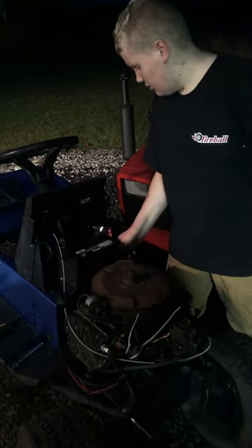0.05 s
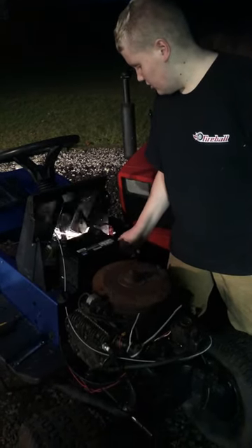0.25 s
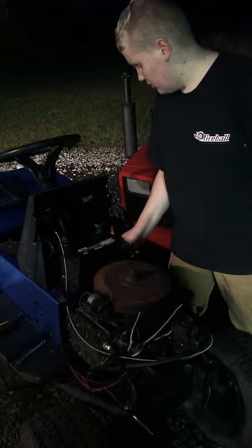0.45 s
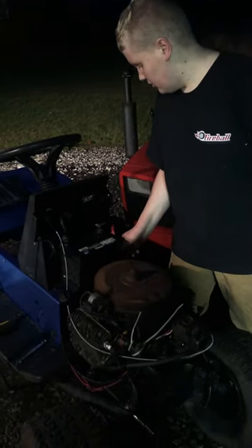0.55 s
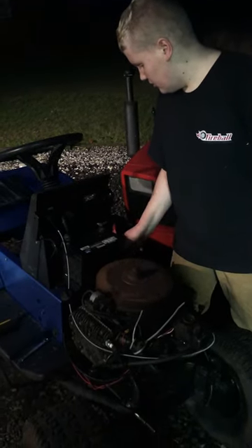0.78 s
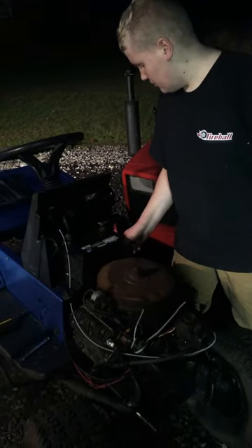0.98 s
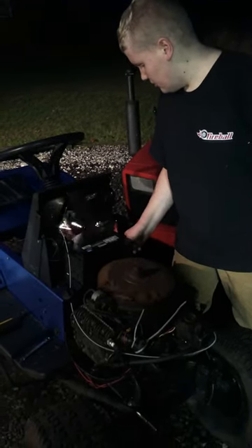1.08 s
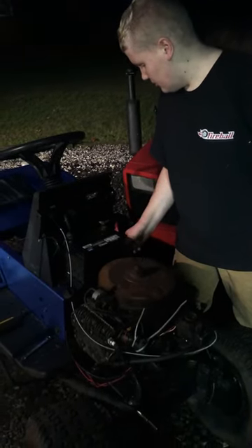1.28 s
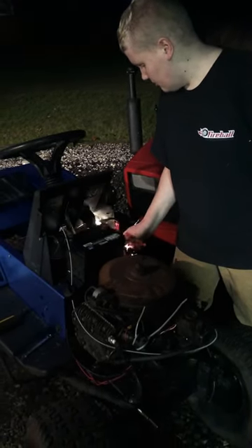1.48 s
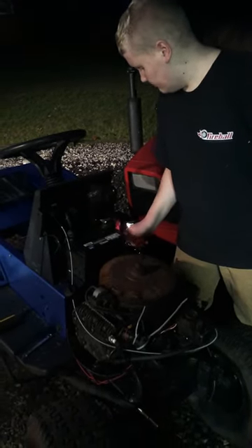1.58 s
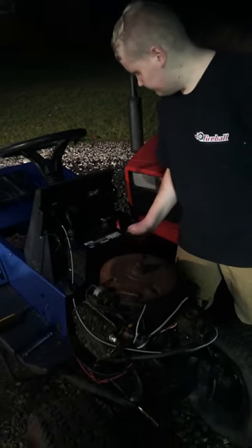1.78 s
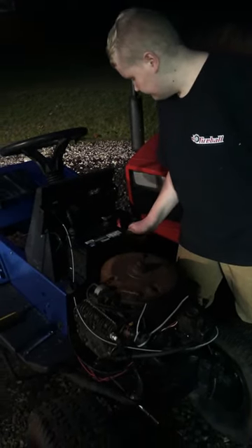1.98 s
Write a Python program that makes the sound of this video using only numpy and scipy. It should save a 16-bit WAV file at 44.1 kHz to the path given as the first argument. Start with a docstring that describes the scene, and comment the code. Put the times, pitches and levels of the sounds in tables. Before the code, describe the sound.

Electrical sparks snap among metallic starter clacks, outdoors over a faint low drone. A first spark at 0.1 seconds leads into scraping, sizzling and a loud clack and crack around 0.3. Uneven clacks, solenoid knocks and sparks continue from 0.45 to 1.2, the flywheel softly ringing. After a lull, another flurry starts at 1.5, ending with a sharp snap at 1.7 and a fading ring. The engine never fires.

```python
"""Outdoors at night, under a low, distant drone, a live cable is touched to the starter terminal of a
small tractor engine. A faint, dark rustle dies away, then the first spark snaps and echoes in the
engine bay. The starter gear clacks and drags on the flywheel, which rings, while the contact fries.
The solenoid plunger slams home and a loose part pings. Sparks, clacks and scrapes return in uneven
flurries, ending on a sharp snap and a last ring of the flywheel; the engine never fires."""
import sys
import numpy as np
from scipy import signal
from scipy.fft import irfft
from scipy.io import wavfile
from scipy.ndimage import uniform_filter1d

SR = 44100
rng = np.random.default_rng(int(sys.argv[2]) if len(sys.argv) > 2 else 0)


def digitize_waveform(pressure):
    """Quantize a signal to 16-bit integers and store it at the path in sys.argv[1].

    Rows of a 2-D input are taken as channels; values are limited to [-1, 1].
    """
    field = np.atleast_2d(pressure).T
    bounded = np.clip(field, -1, 1)
    quanta = np.round(bounded * 32767).astype(np.int16)
    wavfile.write(sys.argv[1], SR, quanta)


N = 90404
T = np.arange(SR * 3 // 5) / SR  # time axis of a single hit [s]


def amp(db):
    """Decibels to gain."""
    return 10 ** (np.asarray(db) / 20)


def unit(x):
    """Scales to rms 1."""
    return x / np.sqrt(np.mean(x ** 2) + 1e-20)


def read(points, hz):
    """Reads a curve on a log-frequency axis."""
    f, value = np.transpose(points)
    return np.interp(np.log(hz + 1), np.log(f), value)


def add(mix, s, sound):
    """Mixes a sound in at s seconds."""
    part = mix[max(round(s * SR), 0):][:len(sound)]
    part += sound[:len(part)]


def colour(x, eq, size=2048):
    """Minimum-phase EQ with unit power gain: only the curve's shape counts."""
    log_gain = np.log(unit(amp(read(eq, abs(np.fft.fftfreq(size, 1 / SR))))))
    taps = np.fft.ifft(np.exp(np.conj(signal.hilbert(log_gain)))).real
    return signal.fftconvolve(x, taps)[:len(x)]


def tilted(eq, db_per_octave):
    """A brighter or duller version of an EQ curve."""
    return [(hz, db + db_per_octave * np.log2(hz)) for hz, db in eq]


def hiss(n):
    """Noise with a flat spectrum and random phases."""
    return unit(irfft(np.exp(2j * np.pi * rng.random(n // 2 + 1)), n))


def fizz(n, grain_db=4):
    """Hiss with a fast, grainy flicker in level."""
    flicker = unit(uniform_filter1d(rng.standard_normal(n), size=40))
    return hiss(n) * unit(amp(grain_db * np.clip(flicker, -2, 2)))


def wander(shape, width_hz):
    """Random phase drift that widens a pure tone."""
    return np.cumsum(rng.standard_normal(shape), -1) * np.sqrt(2 * np.pi * width_hz / SR)


def ring(modes, detune=0., attack_s=1 / SR, width_hz=0.):
    """Modes that build up and decay, slightly different at every blow."""
    hz, db, t60 = np.transpose(modes)[:, :, None]
    hz = hz * (1 + detune * rng.standard_normal(hz.shape))
    t = T[:int(SR * t60.max())]
    envelope = np.minimum(t / attack_s, 1) * amp(db - 60 * np.maximum(t - attack_s, 0) / t60)
    phase = 2 * np.pi * (hz * t + rng.random(hz.shape)) + wander(envelope.shape, width_hz)
    return (envelope * np.sin(phase)).sum(0)


def tail(eq, t60, size=128, attack_s=0.00031, build_cycles=2.8):
    """Dense reflections: the bass builds up later and dies more slowly than the treble."""
    hz, t, bands = signal.stft(colour(hiss(len(T)), eq), SR, nperseg=size)
    hz = hz[:, None] + SR / size / 2
    bands = bands * amp(-60 * t / read(t60, hz)) * (1 - np.exp(-t * hz / build_cycles))
    return signal.istft(bands, SR, nperseg=size)[1][:len(T)] * (1 - np.exp(-T / attack_s))


def reverb(x, eq, t60):
    """Reflections of a sound, through a tail of unit energy."""
    taps = tail(eq, t60)
    return signal.fftconvolve(x, taps / np.linalg.norm(taps))[:N]


# Drone automation (time [s], pitch [Hz], level [dB])
DRONE_PATH = [(0, 90.5, -55), (.15, 99.6, -56), (.55, 101.2, -64), (0.851, 108.7, -66.5),
              (1.15, 121, -55.5), (1.5, 120.3, -50.5), (1.7, 116.4, -56), (1.829, 118, -50.5),
              (2.05, 116, -58)]
# Bass-heavy night air (frequency [Hz], level [dB])
AIR_EQ = [(20, -39), (30, -27), (45, -20.5), (68, -2), (110, 1), (200, -11.5), (300, -11), (600, -23.5),
          (1000, -18), (1200, -18), (1500, -22.5), (2200, -30), (4000, -37.5), (7500, -41), (16000, -48.5)]


def night_bed(waver_depth=0.019, flutter_db=2.7, air_db=-54):
    """Night air and a far drone that wavers in pitch and level."""
    s, hz, db = np.transpose(DRONE_PATH)
    t = np.arange(N) / SR
    points = N * 24 // SR  # 24 random values a second
    waver, flutter = (unit(signal.resample(rng.standard_normal(points), N)) for _ in range(2))
    cycles = np.cumsum(np.interp(t, s, hz) * (1 + waver_depth * waver)) / SR
    drone = amp(np.interp(t, s, db) + flutter_db * flutter) * unit(np.sin(2 * np.pi * cycles))
    return drone + amp(air_db) * colour(rng.standard_normal(N), AIR_EQ, size=8192)


# The faint opening rustle, then drags of the gear (time [s], length [s], level [dB])
SCRAPE_CUES = [(0, 0.048, -53), (0.165, 0.15, -36), (0.343, 0.19, -41.5), (0.654, 0.071, -35.5),
               (0.845, 0.22, -40.5), (1.142, 0.056, -58.5), (1.22, 0.17, -40)]
# Dark, grinding tone (frequency [Hz], level [dB])
SCRAPE_EQ = [(70, -14), (165, 15.5), (250, -1), (600, -1.5), (1150, 1.5), (2000, -11), (3300, -14.5),
             (5500, -24.5), (11000, -32), (16000, -36.5)]
# Boomy body of scrape echoes and housing thuds (frequency [Hz], level [dB])
THUD_EQ = [(60, -41.5), (170, 0.5), (260, -9.5), (370, -2), (450, -15.5), (590, 0.5), (800, -3.5),
           (1150, -4.5), (1800, -12), (3500, -26.5), (8000, -39.5), (16000, -39)]
# Engine bay reverb (frequency [Hz], 60 dB decay time [s])
BAY_DECAY = [(100, 0.7), (600, 0.39), (1500, 0.15), (5000, 0.33), (15000, 0.049)]


def rustle_and_scrapes(grains_per_s=2400, spread_db=3.5, arch_power=2.1, echo_db=-1.5):
    """Dense grains swell and linger in the bay: a dark rustle, later the gear slipping on the rim."""
    swells = np.zeros(N)
    for s, length, db in SCRAPE_CUES:
        arch = abs(np.sin(np.pi * np.arange(0, length, 1 / SR) / length))
        add(swells, s, amp(db) * arch ** arch_power)
    grains = (rng.random(N) < grains_per_s / SR) * rng.choice([-1., 1.], N)
    strength = amp(spread_db * np.minimum(rng.exponential(1, N), 2.5))
    grit = swells * unit(grains * strength)
    return colour(grit, SCRAPE_EQ) + amp(echo_db) * reverb(grit, THUD_EQ, BAY_DECAY)


# Arcs at the terminal (time [s], length [s], crack level [dB], tilt [dB/octave], echo level [dB])
SPARK_CUES = [(0.1113, 0.002, -28.5, -3.5, -38), (.239, 0.0021, -22.5, 2.5, -38.5),
              (0.346, 0.003, -16, 0.3, -23), (0.9277, 0.0012, -21, -1.5, -28.5),
              (1.026, 0.0021, -23, 3, -30.5), (1.111, 0.0028, -30, -2, -35), (1.516, 0.0015, -38.5, 1, -57),
              (1.5424, 0.0021, -27, -5, -31), (1.6064, .0012, -16, -0.8, -25),
              (1.7278, 0.0014, -12, 1, -23.5)]
# Bright, dry crack (frequency [Hz], level [dB])
CRACK_EQ = [(300, -32.5), (1000, -18), (1830, -17), (3010, -18.5), (4620, -8.5), (5570, -13.5), (6400, -4),
            (7620, -9), (8450, -4), (9300, -12), (10800, -3), (11700, 2.5), (12700, -7.5), (15100, -12),
            (16000, -4)]
# Spark echoes from the bay and the yard (frequency [Hz], level [dB])
SPARK_BAY_EQ = [(70, -34.5), (130, -9), (180, 9), (250, 0), (400, -2), (580, 4.5), (1150, -2), (2200, -5),
                (4500, -8), (8000, -15.5), (11500, -7.5), (16000, -4.5)]
YARD_EQ = [(100, -5), (600, 10), (1500, -5.5), (4000, -20), (8000, -18.5), (16000, -16)]
# Their tails (frequency [Hz], 60 dB decay time [s])
SPARK_BAY_DECAY = [(100, 0.77), (200, 0.3), (600, 0.32), (1300, 0.3), (3000, 0.14), (7000, 0.17),
                   (15000, 0.033)]
YARD_DECAY = [(100, 0.78), (1000, 0.34), (6000, 0.62), (15000, 0.31)]


def sparks(release_s=0.0005, afterglow_s=0.0059, afterglow_db=-9.5, snap_db=10, yard_db=-13):
    """Each arc spits briefly around one sharp snap; the bay and the yard throw back duller echoes."""
    out, t = np.zeros(N), T[:SR // 20]
    for s, arc_s, crack_db, tilt, echo_db in SPARK_CUES:
        burn = np.exp(-np.maximum(t - arc_s, 0) / release_s)
        afterglow = amp(afterglow_db) * np.exp(-t / afterglow_s)
        arc = (burn + afterglow) * rng.choice([-1., 1.], len(t))
        add(arc, .0005, amp([snap_db]))  # the snap is a one-sample spike
        add(out, s, amp(crack_db) * colour(arc, tilted(CRACK_EQ, tilt)))
        echoes = tail(SPARK_BAY_EQ, SPARK_BAY_DECAY) + amp(yard_db) * tail(YARD_EQ, YARD_DECAY)
        add(out, s, amp(echo_db) * echoes)
    return out


# Gear hits (time [s], tick level [dB], tick decay [s], tick tilt [dB/octave], clink level [dB],
# clink pitch [Hz], knock level [dB], knock pitch [Hz], rumble level [dB])
CLACK_CUES = [(.17, -38, .0065, -0.5, -39, 2735, -40.5, 426, -34),
              (0.305, -23.5, 0.0063, -0.5, -33, 2140, -48, 640, -73),
              (0.3133, -18.5, 0.0034, 2.5, -19, 2760, -21.5, 623, -19.5),
              (0.331, -29.5, 0.015, -8, -28, 1634, -23, 1164, -28),
              (.593, -49, 0.022, -7.5, -42, 1920, -68, 610, -49.5),
              (0.6445, -36.5, 0.011, -3, -50, 2160, -40, 1170, -42),
              (.6493, -45, 0.0089, 4, -43, 2000, -35, 1120, -35),
              (0.6651, -32.5, 0.0089, -5, -29.5, 1600, -25.5, 604, -28),
              (0.685, -59, 0.0054, 3, -38, 1740, -28.5, 967, -29.5),
              (.692, -35, 0.0077, -5, -40, 1710, -31, 697, -31.5),
              (.707, -51, 0.0045, -3, -43, 4220, -50, 596, -51),
              (.735, -55, .005, -7, -56, 1560, -34, 723, -32.5),
              (0.8226, -35.5, 0.0043, -2.2, -44, 1480, -37, 560, -30),
              (0.8603, -41, 0.029, -4, -30, 1564, -35, 363, -45),
              (0.9923, -43, 0.009, 2, -54, 1500, -57, 1330, -50),
              (1.041, -44, .008, -3.5, -35, 1860, -28.5, 567, -27.5),
              (1.1, -43, 0.005, -3, -26.5, 1540, -43, 555, -44),
              (1.143, -51, .0065, -7, -39, 1642, -34, 590, -34),
              (1.2207, -41, 0.0026, 1.5, -42.5, 3850, -70, 1130, -51.5),
              (1.5171, -38, 0.0075, -4, -39.5, 1740, -37.5, 565, -34.5),
              (1.55, -22, 0.0065, -1, -30, 1940, -23, 570, -24),
              (1.629, -37, 0.022, -5.5, -27.5, 2006, -28, 627, -33.5),
              (1.71, -31.5, 0.0045, -3, -35, 2910, -32.5, 1256, -26.5)]
# Crisp top of ticks and sizzles (frequency [Hz], level [dB])
TICK_EQ = [(200, -29), (1200, -1), (2500, 2), (5000, 1.5), (8500, -0.5), (11000, -0.5), (13000, -7),
           (15000, -6), (16000, -26.5)]


def gear_clacks(attack_s=0.0011, tail_db=-21, knock_lag_s=0.00099, rumble_lag_s=0.001471):
    """Metal on metal: a rasping tick and a clink at contact, a hard knock, then the housing rumbles."""
    out = np.zeros(N)
    for s, tick_db, decay_s, tilt, clink_db, clink_hz, knock_db, knock_hz, rumble_db in CLACK_CUES:
        eq = tilted(TICK_EQ, tilt)
        rasp = fizz(len(T)) * (1 - np.exp(-T / attack_s)) * np.exp(-T / decay_s)
        tick = colour(rasp, eq) + amp(tail_db) * tail(eq, BAY_DECAY)
        add(out, s, amp(tick_db) * tick + amp(clink_db) * clink(clink_hz))
        add(out, s + knock_lag_s, amp(knock_db) * knock(knock_hz))
        add(out, s + rumble_lag_s, amp(rumble_db) * rumble())
    return out


# Bright partials of the gear (frequency [Hz], level [dB], 60 dB decay time [s])
GEAR_MODES = [(1620, -6, 0.41), (1960, -3.5, 0.063), (2980, -13.5, 0.15), (3440, -9.5, 0.2),
              (4530, -10, 0.023), (10600, -3, 0.036)]


def clink(hz, attack_s=0.00052, decay_s=0.007, width_hz=180, gear_db=-9.5):
    """The struck spot gives a brief, rough ping at its own pitch, over the modes of the gear."""
    phase = 2 * np.pi * (hz * T + rng.random()) + wander(len(T), width_hz)
    ping = np.sin(phase) * np.exp(-T / decay_s)
    add(ping, 0, amp(gear_db) * ring(GEAR_MODES, detune=0.014))
    return ping * (1 - np.exp(-T / attack_s))


# Midrange grit in a knock (frequency [Hz], level [dB])
KNOCK_EQ = [(100, -25.5), (350, -1), (700, 2.5), (1200, -1.5), (2000, -23.5), (5000, -32), (16000, -50.5)]


def knock(hz, peak_s=0.0041, sag_per_s=6, grit_db=-7):
    """The punch of a blow: a few heavily damped, rough cycles that sag in pitch."""
    t = T[:SR // 20]
    envelope = (t / peak_s * np.exp(1 - t / peak_s)) ** 2
    cycles = np.cumsum(hz * np.exp(-sag_per_s * (t - peak_s))) / SR
    tone = np.sin(2 * np.pi * (cycles + rng.random()))
    return envelope * (tone + amp(grit_db) * colour(hiss(len(t)), KNOCK_EQ))


# Low partials of the housing (frequency [Hz], level [dB], 60 dB decay time [s])
HOUSING_MODES = [(173.3, -12.5, 0.33), (190, -6.5, 0.19), (367.8, -6, 0.13), (592.7, -1, 0.16),
                 (714, -7.5, 0.043), (1120, 8, 0.016)]


def rumble(attack_s=0.0067, decay_s=0.01, burst_db=-1.5, tail_db=-10.5, housing_db=-3.5):
    """The housing swells and booms after a blow."""
    burst = colour(hiss(len(T)) * np.exp(-T / decay_s), THUD_EQ)
    thud = amp(burst_db) * burst + amp(tail_db) * tail(THUD_EQ, BAY_DECAY)
    add(thud, 0, amp(housing_db) * ring(HOUSING_MODES, detune=0.029))
    return thud * (1 - np.exp(-T / attack_s))


# Blows and rubs on the flywheel (time [s], attack [s], level [dB])
CLANG_CUES = [(.2, .025, -43), (.312, .015, -36), (.36, .05, -34.5), (.51, .02, -49), (.895, .05, -37.5),
              (1.115, .04, -43), (1.55, .05, -40), (1.729, .015, -39.5)]
# Its bell-like partials (frequency [Hz], level [dB], 60 dB decay time [s])
FLYWHEEL_MODES = [(461, -10, .45), (603, -9, .45), (813, -9, .45), (1139, -5, .42), (1226, 0, .42),
                  (1576, -7, .27), (1723, -16, .26), (1923, -15, .4), (1985, -14, .42), (2758, -19, .4),
                  (2868, -18, .4), (3092, -18, .45)]


def flywheel():
    """The iron flywheel sings up as the gear hits or rubs it, then rings on."""
    out = np.zeros(N)
    for s, attack_s, db in CLANG_CUES:
        add(out, s, amp(db) * ring(FLYWHEEL_MODES, attack_s=attack_s, width_hz=3))
    return out


# Frying at the terminal (time [s], length [s], level [dB])
SIZZLE_CUES = [(0.208, 0.1, -47), (0.309, 0.038, -36)]


def sizzles():
    """The contact fries softly around the early snaps."""
    out = np.zeros(N)
    for s, length, db in SIZZLE_CUES:
        n = int(length * SR)
        add(out, s, amp(db) * fizz(n) * signal.windows.tukey(n, .5))
    return colour(out, TICK_EQ)


# Plunger strokes (time [s], slide level [dB], knock level [dB], knock pitch [Hz], rumble level [dB])
PLUNGER_CUES = [(.4455, -30, -26.5, 598, -31.5), (0.8761, -30.5, -26, 560, -23.5),
                (1.114, -30.5, -25.5, 586, -34), (1.573, -29, -22, 590, -30.5)]
# Sharply peaked chirr of the slide (frequency [Hz], level [dB])
SLIDE_EQ = [(300, 3), (1200, -0.5), (2200, 0), (3200, 2), (3600, 16.5), (4050, 7.5), (4500, 3.5),
            (7000, -1.5), (11500, 4), (13500, -9), (16000, -3)]


def plunger(attack_s=.002, slide_s=0.0049, release_s=0.0037, tail_db=-14, stop_lag_s=0.002523):
    """The solenoid plunger slides with a bright chirr and slams into its stop."""
    out = np.zeros(N)
    envelope = np.minimum(T / attack_s, 1) * np.exp(-np.maximum(T - slide_s, 0) / release_s)
    for s, slide_db, knock_db, knock_hz, rumble_db in PLUNGER_CUES:
        chirr = colour(fizz(len(T)) * envelope, SLIDE_EQ) + amp(tail_db) * tail(SLIDE_EQ, BAY_DECAY)
        add(out, s, amp(slide_db) * chirr)
        add(out, s + stop_lag_s, amp(knock_db) * knock(knock_hz))
        add(out, s + stop_lag_s, amp(rumble_db) * rumble())
    return out


# Jolts of a loose part (time [s], level [dB])
PING_CUES = [(0.555, -47.5), (1.116, -52)]
# Its two high partials (frequency [Hz], level [dB], 60 dB decay time [s])
LOOSE_PART_MODES = [(2988, -1.5, 0.16), (3870, -5, .12)]


def loose_part():
    """A small loose metal part is jolted and rings thinly."""
    out = np.zeros(N)
    for s, db in PING_CUES:
        add(out, s, amp(db) * ring(LOOSE_PART_MODES))
    return out


def scene():
    """All layers in one mono mix."""
    mix = night_bed() + rustle_and_scrapes() + sparks() + gear_clacks()
    mix += flywheel() + sizzles() + plunger() + loose_part()
    return mix[None]


def record(dry, cutoff_hz=15950):
    """A steep low-pass trims the very top of the mix."""
    lowpass = signal.firwin(255, cutoff_hz, window=("kaiser", 8), fs=SR)
    return signal.oaconvolve(dry, lowpass[None], "same")


dry = scene()
out = record(dry)
digitize_waveform(out)
```